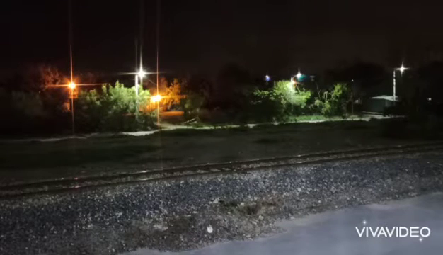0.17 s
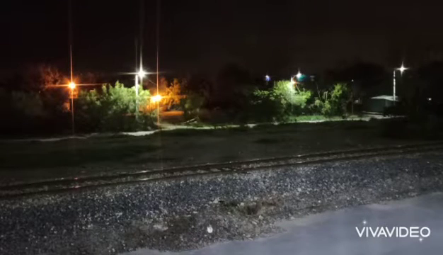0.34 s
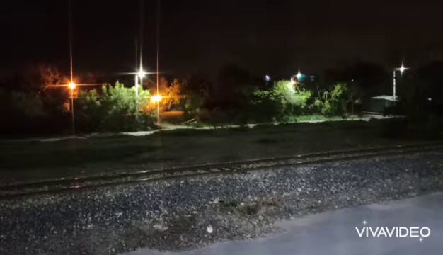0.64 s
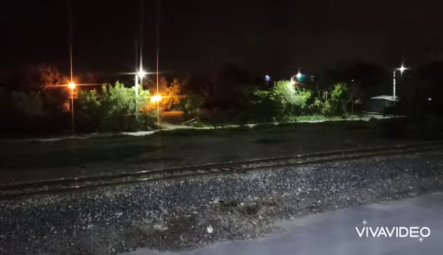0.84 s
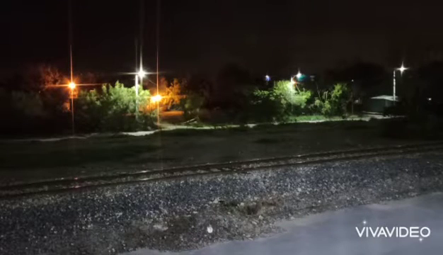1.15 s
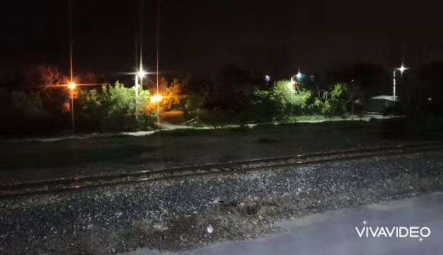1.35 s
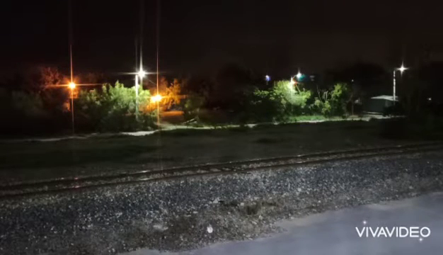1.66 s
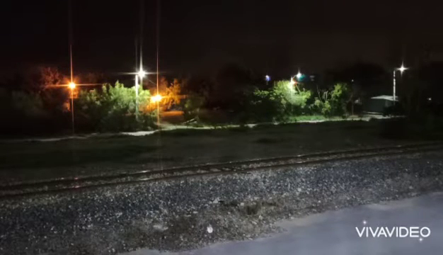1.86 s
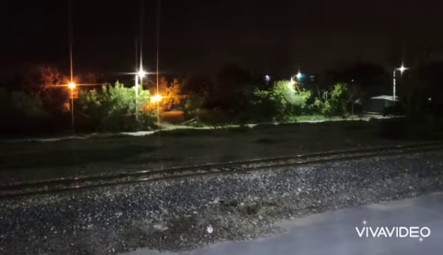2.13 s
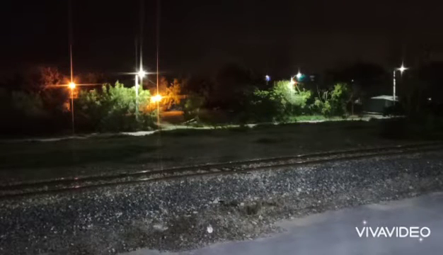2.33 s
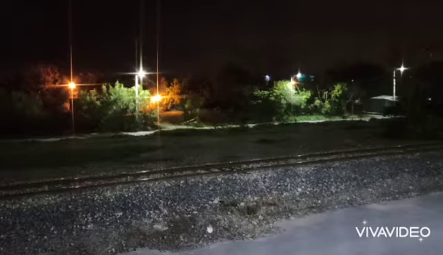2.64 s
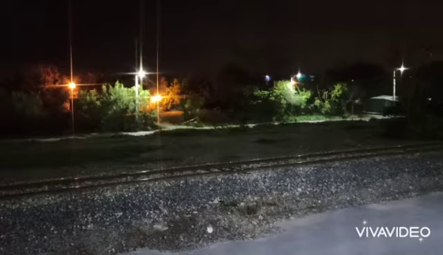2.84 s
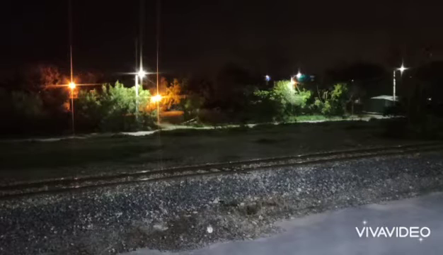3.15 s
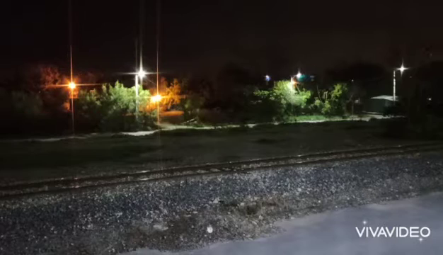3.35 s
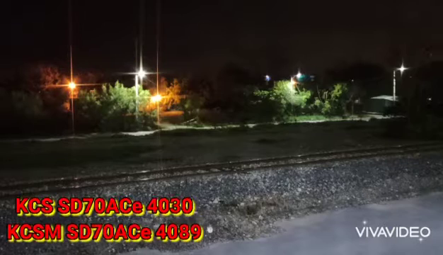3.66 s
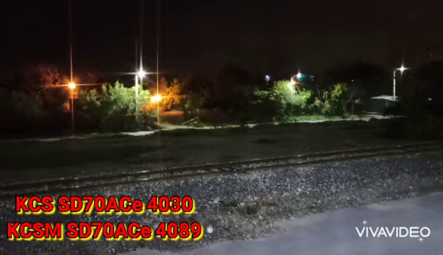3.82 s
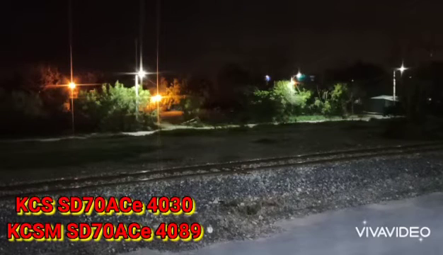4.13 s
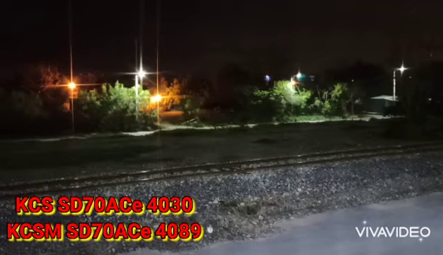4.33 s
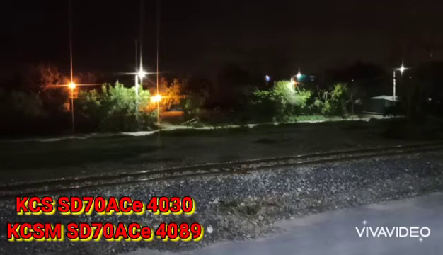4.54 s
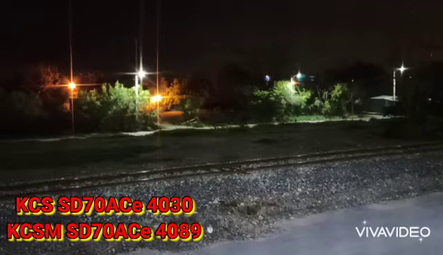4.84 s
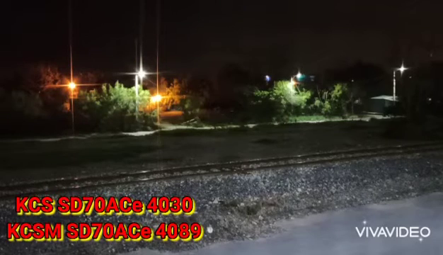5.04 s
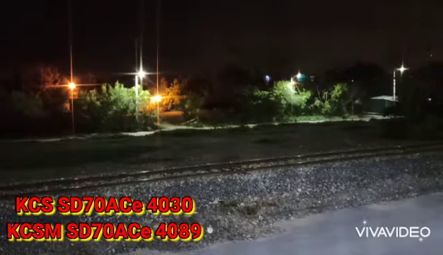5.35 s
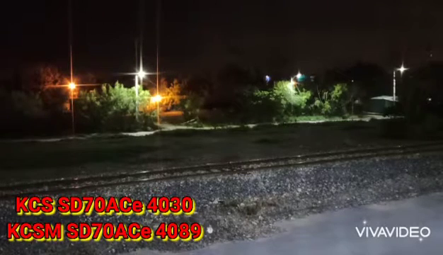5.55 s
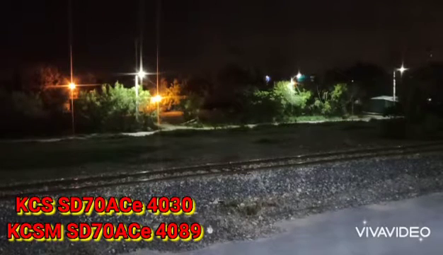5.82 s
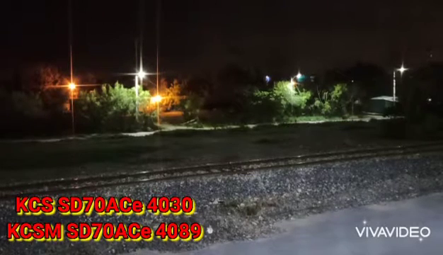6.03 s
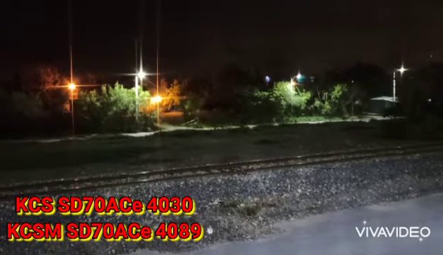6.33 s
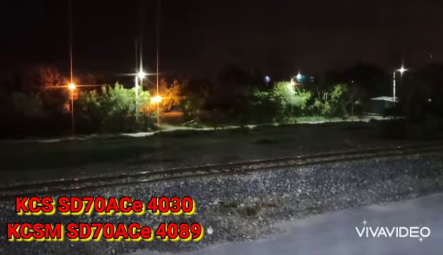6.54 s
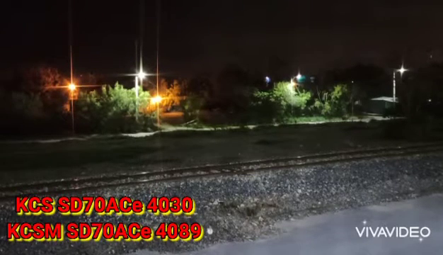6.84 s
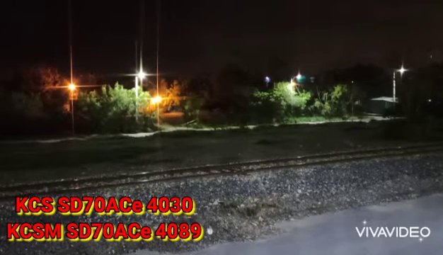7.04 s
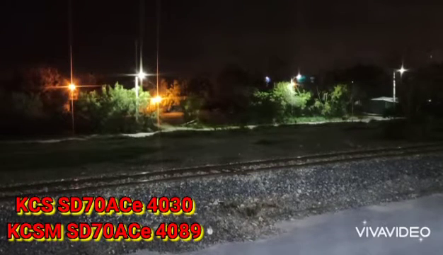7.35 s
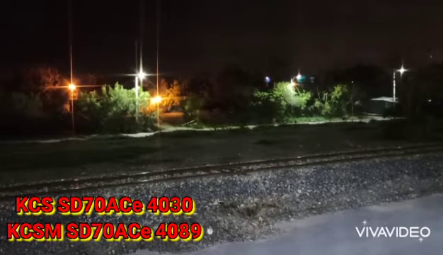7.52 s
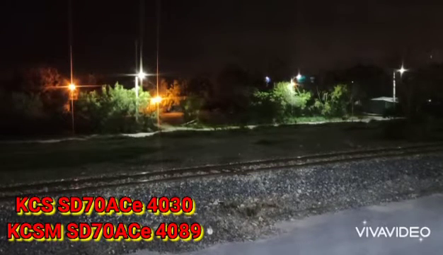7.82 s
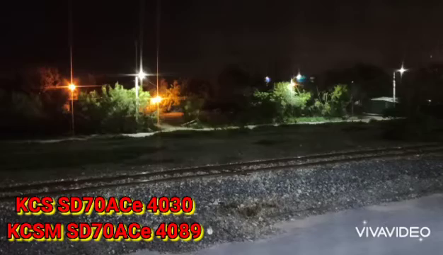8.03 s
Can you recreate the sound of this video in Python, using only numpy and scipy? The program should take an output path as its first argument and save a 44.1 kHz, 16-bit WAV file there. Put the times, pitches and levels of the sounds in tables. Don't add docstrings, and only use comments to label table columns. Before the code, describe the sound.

Steady low diesel throb with growl and rushing noise, swelling slowly as the train nears beyond trees. After about four and a half seconds a dissonant chord horn barks twice in quick succession, pitch sagging, with fluttering echoes dying over about half a second. The engine dips under each blast, then returns with more hiss and treble. Faint insects rasp on top, heard through a phone in the open air.

```python
import sys
import numpy as np
from scipy import signal
from scipy.fft import rfft, irfft, next_fast_len
from scipy.io import wavfile
from scipy.ndimage import uniform_filter1d, minimum_filter1d

SR = 44100
rng = np.random.default_rng(int(sys.argv[2]) if len(sys.argv) > 2 else 0)


def waveform_to_disk(signal):
    frames = np.transpose(np.atleast_2d(signal))
    scaled = np.clip(frames, -1, 1) * 32767
    samples = np.round(scaled).astype(np.int16)
    wavfile.write(sys.argv[1], SR, samples)


def field_ratio(decibels):
    return 10 ** (np.asarray(decibels, dtype=float) / 20)


N = 360738
TIME = np.arange(N) / SR
SIZE = next_fast_len(N, True)
HZ = np.maximum(np.arange(SIZE // 2 + 1) * SR / SIZE, 1)

# t/s, crank turns per second/Hz
CRANK_SPEED = [(0.25, 16.354), (2.25, 16.363), (2.75, 16.327), (3.25, 16.276), (3.75, 16.29),
               (4.25, 16.359), (4.75, 16.398), (5.75, 16.392), (6.75, 16.37), (7.75, 16.358)]
# t/s, level of order 10/dB, order 9 over order 10/dB
EXHAUST_BEAT = [(0.0, -32, -10.5), (0.3, -27, -7.5), (0.6, -30, -3.5), (1.2, -26, -1.5), (1.5, -28, -2),
                (1.8, -27, -13), (2.1, -28.5, -1), (2.7, -26, -4), (3.0, -24.5, -3.5), (3.5, -23, -6),
                (3.9, -24, -2), (4.3, -25, -4), (5.2, -24.5, -2.5), (6.2, -25.5, 2), (6.5, -26, 2),
                (6.8, -25.5, 4), (7.1, -26.5, 4.5), (8.0, -26, 4)]
# t/s, half width/s, depth/dB
CANCELLING = [
    (.72, .12, 9),
    (2.75, .25, 5.5),
    (4.2, .15, 5),
    (7.2, .1, 7),
]
# multiple of crank speed, level over the rumble/dB
LOW_ORDERS = [(5, -1.5), (6, -4.5), (7, -13.5), (8, -9)]
# multiple of crank speed, level over the roar/dB
HIGH_ORDERS = [(13, -11.5), (15, -7.5), (17, -10.5), (20, -8.5), (24, -15), (27, -15), (32, -13), (36, -16),
               (40, -15.5), (43, -14.5), (57, -13)]
# t/s, nearness level/dB, brake-air brightness/dB
NEARNESS = [(0, -34, 2.5), (.1, -34, 4), (1, -32.5, -2.5), (1.5, -32, -1.5), (2.5, -33.5, 2.5),
            (3.5, -32.5, 2.5), (4, -33, -1), (4.55, -32, 2), (5.1, -29, 6), (5.9, -26.5, 7),
            (6.3, -24.5, 1), (6.6, -25, 1), (7.05, -26, 10), (7.55, -26, 4), (7.85, -25, 8),
            (8.18, -23, 5.5)]
# f/Hz, level/dB
RUMBLE_COLOUR = [(30, -32.5), (55, -13.5), (72, -11.5), (110, 0.5), (170, -7), (200, -12), (260, -59.5)]
ROAR_COLOUR = [(150, -25), (210, -1.5), (320, -0.5), (450, -5.5), (680, -0.5), (950, -4.5), (1150, -13),
               (1500, -25)]
HISS_COLOUR = [(900, -14.5), (1250, -2), (1600, -4.5), (2100, -6), (2800, -12), (3300, -9), (3900, -25)]
TREBLE_COLOUR = [(2900, -14.5), (3500, -2), (6000, -5), (8600, 2)]
# f/Hz, width/Hz, level/dB
NOISE_PEAKS = [(306, 23, 2.5), (399, 8.3, 6), (525, 37, 3), (607, 11, -8), (761, 56, 2), (940, 17, 4.5),
               (1158, 44, 6), (1259, 8.9, 9.5), (1320, 15, 10.5), (2060, 8.1, 9.5)]

# t/s, length/s, level/dB, attack/s
BLASTS = [
    (4.587, .33, -15, 0.029),
    (5.264, 0.463, -14.5, .013),
]
# start/s, end/s
HORN_SPAN = (4.57, 6.4)
# f/Hz, share of the pitch sag
BELLS = [(331, 1.0), (410.5, .9), (447.5, 1.2), (258.5, 1.0), (270, .1)]
# levels of partials 1, 2, .. /dB
BELL_PARTIALS = [(-5, 0.5, -7.5, -3.5, -19.5, -13.5), (-12, -2.5, -7, -10.5, -12.5, -20),
                 (-6, -3.5, -5.5, -23, -20, -25), (-39, -2, -13.5, -7, -14, -10, -22, -18),
                 (-18, -2, -9, -11.5, -24.5, -20, -26.5, -24)]
# level at the onset/dB, change while held/dB per s, level in the tail/dB
BELL_AIR = [(5, -13, -0.5), (1, -5.5, 7), (7, -9, 3.5), (0, -4.5, 1.5), (1, 2, -3.5)]
SECOND_BLAST = [1, 0.5, -2.5, 0.5, 0.5]
# f/Hz, level/dB
OVERTONES = [(1100, 2.5), (1600, -5), (2050, 1), (2600, -9.5), (3400, -5), (4100, -11), (4500, -10.5),
             (5200, -9.5), (8500, -11)]

# t/s, length/s, level/dB
INSECT_BURSTS = [(-.02, .12, -61), (0.577, 0.5, -57), (1.06, 0.41, -54), (1.547, 0.28, -53.5),
                 (2.148, 0.18, -53), (2.75, 0.24, -53), (4.068, .09, -57), (4.348, 0.22, -48),
                 (4.65, 0.23, -62), (5.006, 0.053, -50), (5.26, 0.039, -48.5), (5.316, 0.27, -61),
                 (5.584, 0.35, -58), (6.143, .33, -47.5), (6.5, 0.39, -50), (6.858, 0.28, -45.5),
                 (7.14, 0.18, -53), (7.6, 0.57, -62), (8.073, .15, -44)]
# f/Hz, level/dB
INSECT_COLOUR = [(9300, -42), (10200, -25), (11000, -24.5), (12700, -20.5), (13200, -11.5), (15300, -12.5),
                 (15550, -9.5), (15700, -79)]
# f/Hz, level/dB
FAR_INSECT_COLOUR = [(11200, -51.5), (11600, 6.5), (15000, -3), (15300, -51)]

# f/Hz, level/dB
HOUSING = [(30, -0.5), (70, 0), (3700, 0), (3950, 4), (4650, 1), (4800, -3), (5900, -11), (6150, -0.5),
           (6850, 3.5), (7000, -2.5), (7550, 0), (7700, -12), (8450, -5.5), (8600, -15.5), (9000, -66.5)]
# f/Hz, left over right level/dB, left lead beyond the lag/rad, likeness 0-1
PORTS = [(60, 3, 1.4, 0.85), (163, 2, -1.14, 1), (308, 3.5, 0.07, 0.79), (670, 1, -2.31, 0.67),
         (894, 0.3, 1.17, 0.08), (1318, 1.1, -.3, 0.65), (1533, -4, 1, 0.56), (2030, 3.5, -0.9, 1),
         (2890, 1.5, 0.37, 0.39), (3990, -0.5, -0.43, 0.99), (4470, 1.5, -1.77, .8), (5170, -1.5, 1.5, 0.7),
         (6470, 0, 0.54, 0.6), (8300, 5, 2.5, 0.4)]


def engine():
    start_turns = -0.65
    crank = 2 * np.pi * (np.cumsum(in_time(CRANK_SPEED)[0]) / SR + start_turns)
    rumble_db = -35 + 1.08 * TIME + duck()
    for s, half_width, depth_db in CANCELLING:
        rumble_db = rumble_db - depth_db * np.exp(-((TIME - s) / half_width) ** 2)
    before_horn_db = 2 * (TIME < BLASTS[0][0])
    near_db, bright_db = in_time(NEARNESS)
    roar_db = near_db + before_horn_db + 0.84 * duck()
    tones = exhaust_beat(crank)
    tones = tones + field_ratio(rumble_db) * crank_orders(LOW_ORDERS, crank, fade_db=1.2, wander=0.83)
    tones = tones + field_ratio(roar_db) * crank_orders(HIGH_ORDERS, crank, fade_db=2.85, wander=0.64)
    return tones + train_noise(crank, rumble_db, roar_db, bright_db)


def exhaust_beat(crank):
    ten_db, nine_over_ten_db = in_time(EXHAUST_BEAT)
    ten_db = ten_db + duck()
    nine_db = ten_db + nine_over_ten_db - 0.3 * duck()
    ten = field_ratio(ten_db) * np.sin(10 * crank)
    nine = field_ratio(nine_db) * np.sin(9 * crank)
    return np.sqrt(2) * (ten + nine)


def crank_orders(table, crank, fade_db, wander):
    total = np.zeros(N)
    for multiple, db in table:
        level = field_ratio(db + fade_db * drift(3.35))
        total += level * np.sin(multiple * crank + wander * drift(1.42))
    return total


def train_noise(crank, rumble_db, roar_db, bright_db):
    peaks_db = sum(db / (1 + (2 * (HZ - hz) / width) ** 2) for hz, width, db in NOISE_PEAKS)
    town_db = 5.5 * np.exp(-TIME / 0.87)
    wash_db = np.zeros(N)
    for s, held, *_ in BLASTS:
        wash_db += 9.5 * (TIME > s) * np.exp(-np.maximum(TIME - s - held, 0) / 0.37)
    hiss_db = roar_db - 13 + 0.13 * bright_db + town_db + wash_db
    treble_db = roar_db - 9 + bright_db
    throb = field_ratio(0.36 * np.cos(crank))
    gust_db = 1.0 * drift(7.8)
    rumble = field_ratio(rumble_db - 2.0) * noise(RUMBLE_COLOUR)
    roar = field_ratio(roar_db + 1.38 + 0.73 * drift(8.8)) * throb * noise(ROAR_COLOUR, peaks_db)
    hiss = field_ratio(hiss_db + 4.0 + gust_db) * noise(HISS_COLOUR, peaks_db)
    treble = field_ratio(treble_db + 2.5 + gust_db) * noise(TREBLE_COLOUR)
    return rumble + roar + hiss + treble


def horn():
    first, last = round(HORN_SPAN[0] * SR), round(HORN_SPAN[1] * SR)
    t = TIME[first:last]
    size = len(t)
    low_gain, high_gain, sag_pct, echo, drives_db = blowing(t)
    echo = np.clip(echo, 0, 1)
    low, high = np.zeros((2, 2, size))
    for (hz, share), partials_db, drive_db in zip(BELLS, BELL_PARTIALS, drives_db):
        bend = share * sag_pct / 100 + 0.00174 * drift(15.8, size)
        cycles = np.cumsum(hz * (1 + bend)) / SR
        for k in range(1, int(5000 / hz)):
            if k <= len(partials_db):
                level_db = partials_db[k - 1]
            else:
                level_db = -17 + at_hz(OVERTONES, k * hz)[0] + rng.normal(0, 1.1)
            level = field_ratio(level_db + drive_db)
            phase = 2 * np.pi * (k * cycles + rng.random())
            cos, sin = np.cos(phase), np.sin(phase)
            blur = np.maximum(echo, min(hz * k / 5000, 0.9) ** 1.5)
            band = low if k * hz < 1150 else high
            for row, wet in enumerate((blur, 0.15 + 0.85 * blur)):
                even = np.sqrt(wet / 2) * drift(3.5 + hz * k / 170, size)
                odd = np.sqrt(wet / 2) * drift(3.5 + hz * k / 170, size)
                band[row] += level * ((np.sqrt(1 - wet) + even) * cos + odd * sin)
    air = 0.5 * noise([(250, -40), (400, -6)] + OVERTONES)[:, :size]
    fade = np.clip((t[-1] - t) / 0.35, 0, 1) * np.clip((t - t[0]) / 0.02, 0, 1)
    low = low_gain * field_ratio(2.5) * rms_one(low)
    high = high_gain * field_ratio(3.5) * rms_one(rms_one(high) + air)
    out = np.zeros((2, N))
    out[:, first:last] = fade * (low + high)
    return out


def blowing(t):
    high_release_s, flat_s = 0.09, 0.12
    table = np.array(BLASTS)
    latest = np.maximum(np.searchsorted(table[:, 0], t) - 1, 0)
    s, held, db, attack = table[latest].T
    u = np.maximum(t - s, 0)
    after = np.maximum(u - held, -high_release_s)
    late = ramp(after, flat_s)

    low_db = db + 7 * np.exp(-u / 0.056)
    low_db = low_db - 2.5 * ramp(u - held, 0.04)
    low_db = low_db - 10.5 * np.maximum(after, 0)
    low_db = low_db - 4 * ramp(after - 0.325, 0.015)
    low = ramp(u, attack) ** 2 * field_ratio(low_db)

    high_db = db - 6.5 + 2 * np.exp(-u / 0.092)
    high_db = high_db - 4 * ramp(after + high_release_s / 2, high_release_s) - 27 * after
    high = ramp(u - 0.0077, attack) ** 2 * field_ratio(high_db)

    sag_pct = 1.7 * np.exp(-u / 0.07) - 3.6 * np.minimum(u, held) - 0.7 * late
    echo = 0.17 + (0.95 - 0.17) * late
    drives_db = []
    for (onset_db, slope, tail_db), again_db in zip(BELL_AIR, SECOND_BLAST):
        drive_db = (1 - late) * (onset_db + slope * u) + late * tail_db
        drives_db.append(drive_db + again_db * (s > BLASTS[0][0]))
    return low, high, sag_pct, echo, drives_db


def insects():
    far = field_ratio(-77.0 + 2.0 * TIME) * noise(FAR_INSECT_COLOUR)
    uneven_db = np.repeat(rng.normal(0, 5, SIZE // 300 + 1), 150)[:len(HZ)]
    return rasping() * field_ratio(3.7 + 1.5 * drift(30)) * noise(INSECT_COLOUR, uneven_db) + far


def rasping():
    rest_db, swell_db, rise_s = -72, 0.5, 0.04
    power = field_ratio(2 * rest_db)
    for s, held, db in INSECT_BURSTS:
        u = TIME - s
        fall_db = 20 * np.maximum(u - held, 0) / (0.08 + 0.6 * held)
        level_db = db + swell_db * (ramp(u, held) - 2.5) - fall_db
        power = power + (ramp(u, rise_s) * field_ratio(level_db)) ** 2
    return np.sqrt(power)


def duck():
    depth_db, late_s, sink_s, recover_s = 11.5, 0.051, 0.058, 0.16
    total_db = np.zeros(N)
    for s, held, *_ in BLASTS:
        sink = ramp(TIME - s - late_s, sink_s)
        total_db -= depth_db * sink * (1 - ramp(TIME - s - held, recover_s))
    return total_db


def ports(field, turn_db):
    lag_s = 21 / SR
    direct, scattered = rfft(field, SIZE) * field_ratio(at_hz(HOUSING)[0])
    pan_db, lead, alike = at_hz(PORTS)
    pan_db = pan_db + turn_db
    alike = np.clip(alike, 0, 1)
    mixed = alike * direct + np.sqrt(1 - alike ** 2) * scattered * 1j
    right = mixed * np.exp(-1j * (2 * np.pi * HZ * lag_s + lead))
    return irfft([direct * field_ratio(pan_db / 2), right * field_ratio(-pan_db / 2)], SIZE)[:, :N]


def noise(points, shape_db=0):
    spectrum = rfft(rng.standard_normal((2, SIZE)))
    return rms_one(irfft(spectrum * field_ratio(at_hz(points)[0] + shape_db), SIZE)[:, :N])


def drift(rate, size=N):
    step = 64
    r = np.exp(-2 * step * np.pi * rate / SR)
    chance = rng.standard_normal(size // step + 1002)
    slow = signal.lfilter([1], [1, -2 * r, r * r], chance)[1000:]
    return np.interp(np.arange(size) / step, np.arange(len(slow)), rms_one(slow))


def rms_one(x):
    return x / np.sqrt(np.mean(np.abs(x) ** 2) + 1e-20)


def in_time(rows, t=TIME):
    s, *columns = np.transpose(rows)
    return [np.interp(t, s, c) for c in columns]


def at_hz(points, hz=HZ):
    f, *columns = np.transpose(points)
    return [np.interp(np.log(hz), np.log(f), c) for c in columns]


def ramp(u, span):
    return np.clip(u / span, 0, 1)


def scene():
    return ports(engine(), turn_db=0.8) + ports(horn(), turn_db=-0.8) + insects()


def roll_off(x):
    return signal.sosfilt(signal.butter(12, 16110, fs=SR, output="sos"), x)


def record(dry):
    over = np.maximum(np.abs(dry).max(axis=0) / 0.85, 1)
    gain = uniform_filter1d(minimum_filter1d(1 / over, size=441), size=441)
    return roll_off(dry * gain)


dry = scene()
out = record(dry)
waveform_to_disk(out)
```